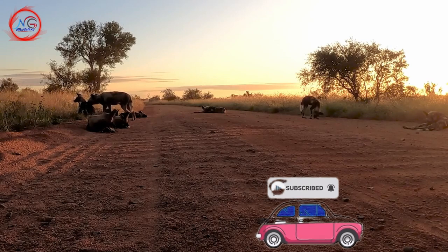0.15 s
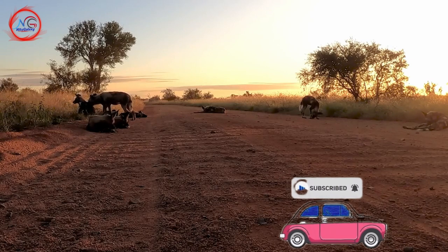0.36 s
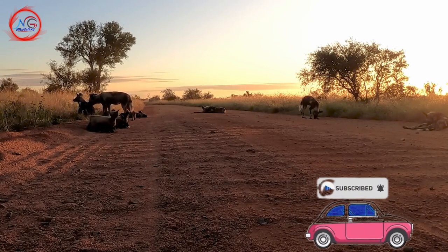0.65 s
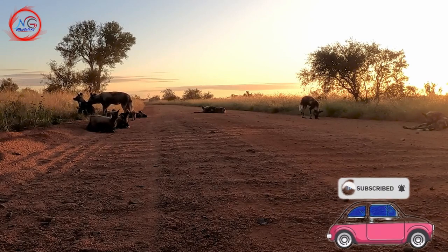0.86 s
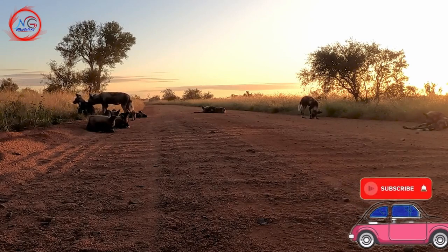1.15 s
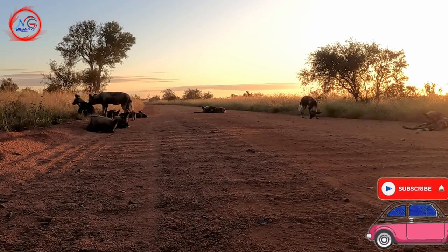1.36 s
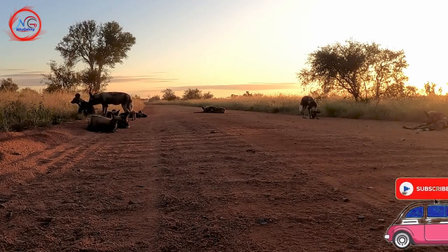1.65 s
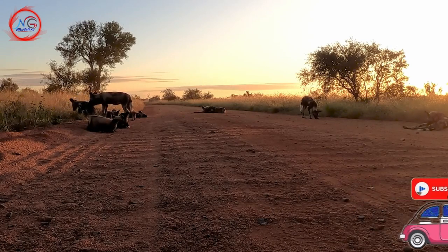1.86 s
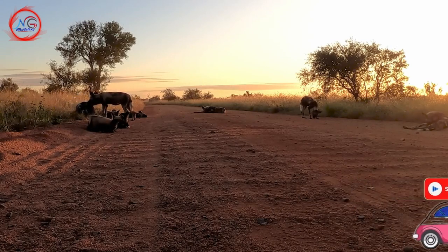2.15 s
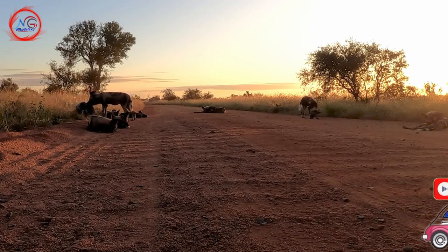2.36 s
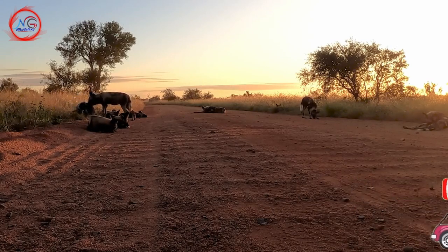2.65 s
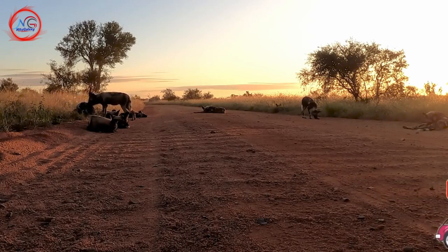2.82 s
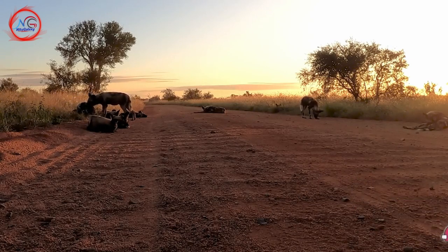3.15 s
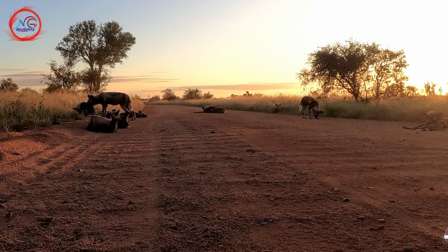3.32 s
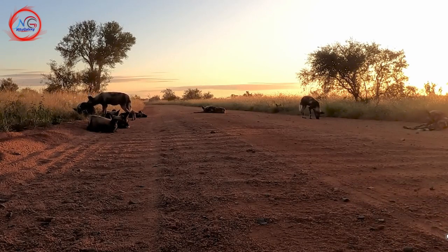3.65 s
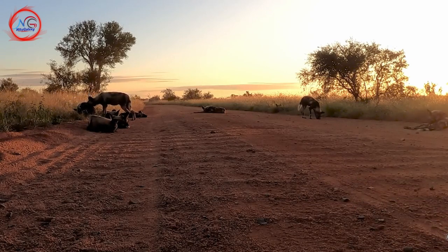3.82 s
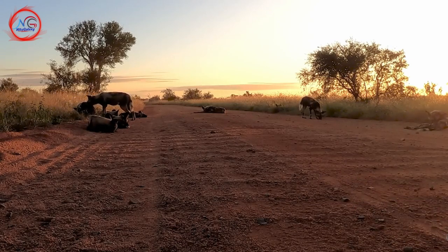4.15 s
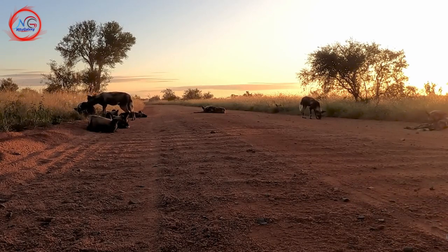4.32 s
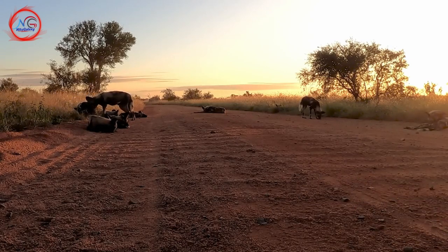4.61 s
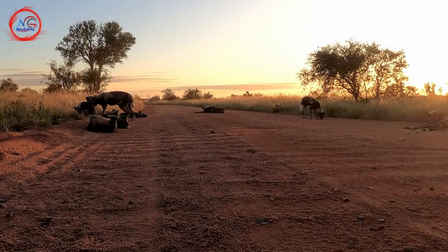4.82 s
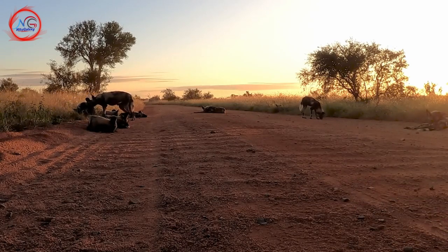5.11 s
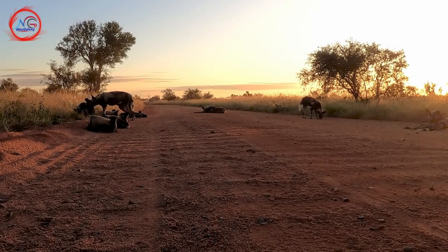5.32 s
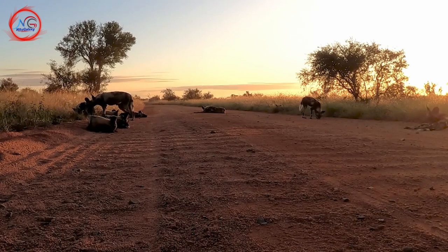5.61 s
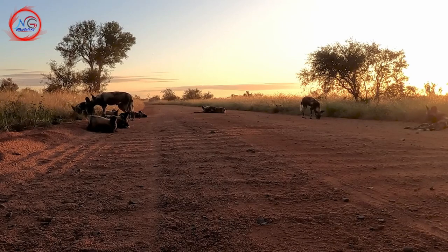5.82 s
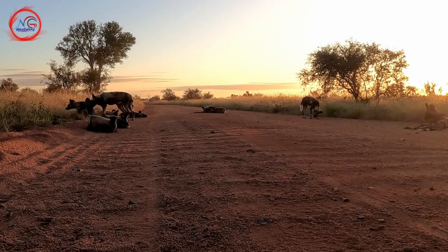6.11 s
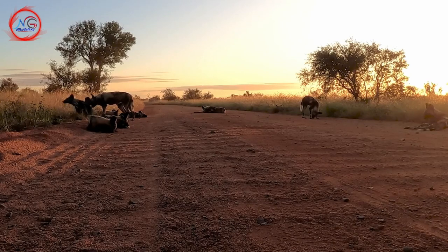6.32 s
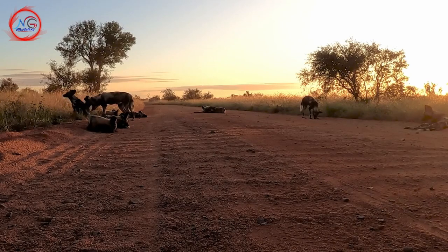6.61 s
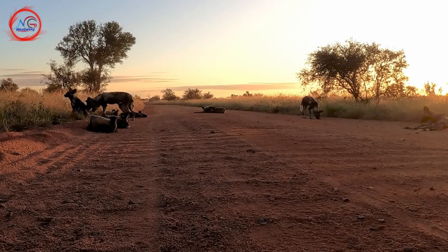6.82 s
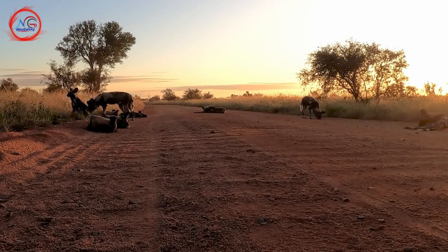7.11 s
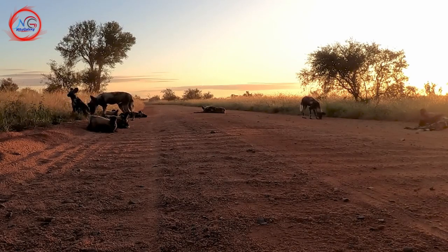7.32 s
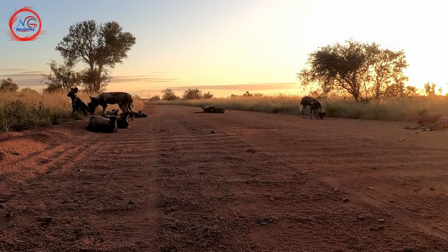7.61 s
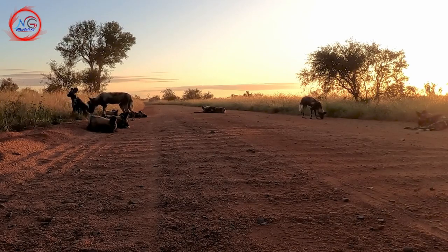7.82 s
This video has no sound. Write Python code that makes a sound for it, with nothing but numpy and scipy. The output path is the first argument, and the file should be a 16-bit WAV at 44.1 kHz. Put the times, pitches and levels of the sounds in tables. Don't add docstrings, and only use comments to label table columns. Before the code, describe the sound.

Outdoor dawn chorus in dry open grassland. A nearby bird whistles clear arched phrases and short held notes, while small warblers add falling slurs in threes, quick trills, ticks and pips. A thin high singer climbs early, then slides downward near the end. Later come dry double-note rattles. Very faint dove coos and steady frog knocks sit far back under a soft continuous hiss, with slight echoes from scrub.

```python
import sys
import numpy as np
from scipy import signal
from scipy.fft import next_fast_len
from scipy.io import wavfile
from scipy.ndimage import uniform_filter1d

SR = 44100
rng = np.random.default_rng(int(sys.argv[2]) if len(sys.argv) > 2 else 0)


def materialize(psi):
    bounded = np.clip(np.atleast_2d(psi).T, -1, 1)
    quanta = np.round(bounded * 32767).astype(np.int16)
    wavfile.write(sys.argv[1], SR, quanta)


def volts(x):
    e = np.asarray(x, float) / 20
    return 10 ** e


N = 351036

# frequency in Hz, density in dB per Hz.
AIR = [(88, -62), (150, -75), (372, -42.5), (649, -28.5), (894, -13), (1150, -14), (1590, -10), (3110, -8),
       (3560, -12), (4820, -3.5), (5250, -10.5), (5500, -19), (7340, -20), (8150, -23), (8400, -33.5),
       (9000, -27.5), (10900, -31), (18500, -120)]
# frequency in Hz, density in dB per Hz.
TOP = [(4880, -29), (8300, -29.5), (8590, -15), (9820, -2.5), (11000, -4.5), (12800, 2.5), (13150, -5),
       (15600, -9.5)]

# time after the start in seconds, offset from the centre pitch in Hz.
SLUR = [(0, 298.5), (.02, -300)]
TRILL = [(0, 400.5), (.005, 0.5), (.012, -450)]
PIP = [(0, 28), (0.016, -34.5)]
RISE = [(0, -700), (.008, 102), (.02, 698)]
TICK = [(0, -1900), (.006, -0.5), (0.012, 1999)]
BUZZ = [(0, -700), (.006, 702.5)]
FLICK = [(0, -1100), (.003, -100), (.012, 357)]
HOOK = [(0, -1000), (.004, 150.5), (.011, -49.5), (.024, -160)]
STROKE = [(0, -300), (.009, 248)]
GRACE = [(0, -400), (.008, 400.5)]
COO = [(0, 21), (.045, -21)]
CROAK = [(0, 127.5), (.012, -120)]

# share of the length, share of the way from low to top pitch, dB from the note's level.
ARCH = [(0, .2, -14.5), (.12, .5, -5), (.25, .75, -1), (.57, 1, 0), (.82, .78, -1), (1, -.12, -4)]
WAVE = [(0, 0, -5), (.2, .2, -1.5), (.5, 0.99, -0.5), (.75, .6, -1.5), (1, -.05, -4)]
LIFT = [(0, 0.0056, -12), (.3, .5, -13), (.55, .78, -6), (.78, 0.89, -0.5), (.97, 1, -3), (1, 0.93, -13)]
STRAIGHT = [(0, 0.23, -4.5), (.6, .7, -2.5), (1, 0.82, 3.5)]
DROP = [(0, 0.75, -25.5), (.1, 0.99, -20.5), (.25, 0.95, -19.5), (.6, 0.74, -14), (.9, .13, -0.5),
        (1, 0.029, -18.5)]
SLIDE = [(0, 0.97, -14.5), (.1, .85, -6), (.4, .63, -11.5), (.7, .33, -7), (.85, .16, -3.5),
         (1, 0.071, 0.5)]

# start in seconds, length in seconds, first pitch in
# Hz, last pitch in Hz, level in dB.
FAR_GLIDES = [(1.267, .06, 3450, 2640, -57.5), (1.64, 0.05, 3370, 2676, -57.5),
              (2.741, 0.032, 3300, 2886, -53), (2.784, 0.03, 2910, 2500, -64),
              (4.564, 0.015, 4260, 3720, -51.5), (5.487, 0.03, 4700, 3440, -56),
              (6.567, 0.019, 3840, 3090, -53.5), (6.538, 0.053, 3300, 2910, -63),
              (3.636, 0.015, 3376, 3044, -44.5), (3.256, .13, 3114, 2216, -59.5),
              (3.377, 0.078, 3400, 3190, -63), (3.53, 0.084, 2926, 2150, -59.5),
              (6.371, 0.14, 2970, 2340, -65), (6.625, .13, 3040, 2313, -59),
              (6.787, 0.072, 3340, 2850, -63.5), (6.811, 0.035, 3840, 3360, -54),
              (6.88, 0.1, 3035, 2186, -62.5), (7.123, 0.045, 3699, 3380, -61.5),
              (.002, 0.13, 1925, 1926, -63), (1.268, .03, 3750, 3640, -54.5),
             (2.185, .12, 2390, 2410, -63.5), (2.323, .034, 3760, 3750, -57),
             (3.488, 0.039, 3660, 3720, -55.5), (7.01, .06, 2150, 2000, -68),
             (.39, 0.12, 1830, 1840, -69.5), (7.56, 0.13, 2100, 2250, -66.5),
             (2.654, .019, 2950, 3350, -54), (5.59, 0.02, 3400, 3300, -58),
             (5.64, 0.039, 3050, 3400, -58.5), (5.725, 0.018, 3400, 4100, -60.5),
             (6.365, 0.018, 3650, 2700, -58), (6.074, .036, 2420, 2200, -60),
             (4.212, .035, 3680, 3780, -55), (5.39, 0.053, 3610, 3810, -59),
             (6.538, 0.031, 3900, 3750, -51),
              (0.521, .045, 2590, 2525, -60.5), (0.825, 0.036, 1850, 2040, -66.5),
               (1.322, .05, 2750, 2580, -67), (1.69, 0.033, 2750, 2610, -64.5),
               (1.752, 0.09, 3105, 2585, -68.5), (1.906, 0.047, 1846, 2070, -65),
               (1.759, .04, 5620, 6180, -62), (1.79, .03, 4980, 5700, -62), (2.233, .04, 6000, 5030, -64.5),
               (2.34, 0.043, 2467, 2400, -66.5), (2.863, .035, 2365, 2140, -63),
               (3, .07, 3340, 3230, -63.5), (3.248, 0.021, 3650, 3720, -61.5),
               (5.115, 0.026, 2890, 3990, -55.5), (5.305, .07, 3370, 3170, -63),
               (5.295, .05, 3770, 3640, -63), (4.1, .015, 3880, 3760, -54), (4.351, .03, 4100, 3920, -57.5),
               (1.382, .015, 5620, 7200, -68), (1.577, .02, 6000, 6800, -70.5),
               (5.011, .02, 4710, 5550, -61.5)]
FAR_HOOKS = [
    (6.6, 0.031, 2406, 2560, -56),
]
FAR_BOWS = [
    (2.551, .175, 2400, 1830, -64.5),
    (2.672, .058, 3500, 3560, -48),
    (2.19, .11, 3080, 3250, -66),
    (6.73, .17, 1930, 1880, -67.5),
    (2.39, .085, 1760, 1800, -68),
]

# start in seconds, number of notes, level in dB.
SLUR_GROUPS = [(.015, 3, -60.5), (.637, 3, -53.5), (1.232, 3, -59), (3.37, 1, -58), (2.83, 3, -64),
               (5.399, 3, -58.5), (3.62, 2, -60), (.95, 1, -55), (1.518, 1, -58.5), (2.602, 3, -54),
               (4.013, 3, -60), (4.487, 3, -54.5), (4.745, 1, -53), (6.152, 2, -54), (6.802, 2, -54.5),
               (7.612, 1, -52), (.271, 3, -53), (.999, 3, -52), (1.394, 3, -53.5), (1.551, 1, -54.5),
               (1.834, 3, -52), (2.118, 3, -57.5), (2.26, 3, -52), (2.422, 3, -58.5), (2.983, 3, -53),
               (3.403, 3, -51), (3.774, 3, -53.5), (4.148, 3, -54), (4.305, 3, -61), (5.202, 3, -52.5),
               (5.665, 1, -52), (5.976, 3, -53.5), (6.419, 3, -51.5), (6.869, 2, -49.5), (7.186, 3, -52),
               (7.392, 3, -58)]

# start in seconds, length in seconds, low pitch in Hz, top pitch in Hz, level in dB.
ARCHES = [
    (0.024, 0.096, 2353, 2960, -45.5),
    (0.436, 0.081, 2506, 2987, -45),
    (0.58, 0.099, 2283, 3010, -47),
    (3.746, 0.094, 2594, 3005, -45),
    (3.9, 0.07, 2366, 2920, -43.5),
    (4.282, 0.086, 2456, 2956, -43.5),
    (4.428, 0.087, 2340, 2930, -44.5),
    (7.671, 0.079, 2386, 3003, -41),
    (7.807, 0.092, 2370, 2860, -42),
]
WAVES = [
    (0.115, 0.096, 2343, 2974, -44.5),
    (.209, 0.086, 2305, 2637, -46.5),
    (3.986, 0.076, 2318, 2844, -43.5),
    (4.069, .085, 2305, 2505, -46.5),
    (7.908, 0.077, 2387, 2780, -43),
]
LIFTS = [
    (4.525, 0.13, 2244, 3236, -35.5),
]
# time in seconds, pitch in Hz, level in dB.
LONG_NOTES = [
    [(0.712, 2460, -52.5), (0.724, 2625, -47.5), (0.742, 2990, -44), (0.764, 3196, -37.5),
     (0.81, 3306, -39.5), (0.838, 3204, -44), (0.85, 3222, -54)],
    [(0.99, 3150, -53), (1.0, 3070, -45), (1.018, 3177, -38), (1.056, 3346, -39), (1.112, 3386, -43.5),
     (1.125, 3330, -56.5)],
    [(3.512, 3110, -51.5), (3.528, 3161, -44), (3.56, 3300, -41.5), (3.612, 3346, -39.5),
     (3.634, 3375, -47), (3.644, 3240, -40.5), (3.652, 3120, -48)],
    [(4.785, 3120, -53), (4.795, 3101, -45), (4.815, 3120, -36), (4.843, 3294, -37), (4.881, 3335, -37),
     (4.913, 3318, -40), (4.928, 3318, -56)],
    [(7.408, 3200, -56), (7.42, 3187, -46), (7.434, 3215, -39.5), (7.478, 3370, -37.5), (7.53, 3413, -39.5),
     (7.546, 3405, -43), (7.556, 3380, -57.5)],
]

# first note in seconds, last note in seconds, notes, first pitch in Hz, level in dB.
RISING_TRILLS = [
    (0.541, 0.922, 21.5, 4150, -52.5),
    (1.664, 1.816, 9.5, 4450, -50.5),
    (4.655, 4.945, 16.5, 4410, -50.5),
]
LEVEL_TRILLS = [(0.043, 0.217, 9.5, 4350, -60), (1.626, 1.794, 9.5, 4300, -53.5),
                (1.989, 2.188, 9.5, 3720, -67.5), (2.577, 2.812, 13.5, 5000, -52.5),
                (3.678, 4.036, 19.5, 4350, -53.5), (5.699, 5.82, 7.5, 4500, -53),
                (6.646, 6.779, 8.5, 4890, -51), (7.012, 7.182, 10.5, 5280, -52.5),
                (7.545, 7.677, 9.5, 4400, -50.5), (7.553, 7.622, 5.5, 3240, -55.5),
                (7.699, 7.792, 6.5, 4300, -51)]

# start in seconds, peak level in dB, pitch in Hz.
COOS = [(0.172, -70.5, 887), (0.828, -69.5, 890), (1.14, -77.5, 937), (2.64, -71.5, 930), (4.214, -71, 906),
        (4.639, -71.5, 960), (5.509, -68, 944), (5.737, -69, 923), (6.391, -72, 920), (6.621, -75, 993),
        (7.048, -73, 923), (7.25, -71.5, 870), (7.634, -75.5, 887), (7.719, -74, 865)]

# start in seconds, centre pitch in Hz, level in dB.
TICKS = [(.347, 4750, -49), (.378, 4680, -43), (0.411, 4570, -47), (1.063, 6800, -61), (1.095, 6340, -59),
         (1.127, 6320, -61.5), (1.159, 6030, -60.5), (2.972, 4840, -58), (4.524, 4990, -43),
         (4.556, 5220, -46.5), (4.583, 5240, -49), (4.614, 5140, -54), (5.517, 5590, -42.5),
         (5.547, 5430, -42.5), (5.576, 5170, -40.5), (5.608, 4780, -40), (5.641, 4660, -40.5)]
PIPS = [(1.539, 3980, -49), (1.577, 4050, -50.5), (1.613, 3920, -50), (2.752, 3950, -51),
        (2.958, 3930, -47), (3.102, 3800, -53), (3.845, 3910, -48), (4.519, 3540, -50.5),
        (4.597, 4010, -49), (4.894, 3990, -48.5), (4.93, 4050, -49.5), (4.969, 3890, -44),
        (4.934, 2635, -54.5), (6.265, 7650, -58), (7.196, 3500, -54), (7.275, 4010, -55.5),
        (7.792, 3680, -51.5),
        (3.087, 3890, -55), (3.102, 4270, -50.5), (3.77, 3860, -49), (3.772, 3460, -55),
             (4.48, 3870, -57), (4.53, 3930, -51), (5.525, 2820, -57), (5.55, 2640, -57), (5.84, 3510, -52),
             (5.846, 3930, -51), (5.85, 4720, -49), (5.875, 3880, -51.5), (5.924, 3850, -48.5),
             (1.575, 4720, -53.5)]
RISES = [(1.983, 5220, -59.5), (2.328, 6620, -65), (2.365, 5300, -63), (2.525, 6330, -63.5),
         (2.559, 5350, -65.5), (2.721, 6470, -64.5), (2.914, 6410, -63), (3.027, 4110, -47),
         (2.947, 5100, -62.5), (3.138, 4920, -59.5), (3.109, 6420, -66.5), (4.497, 5300, -50),
         (5.06, 4060, -58), (5.069, 6040, -62), (5.16, 4440, -50)]
STROKES = [
    (4.964, 1975, -53.5),
    (4.977, 1960, -56.5),
    (5.013, 2070, -56.5),
    (5.043, 2054, -56.5),
    (5.093, 1970, -54),
    (5.041, 3550, -55),
    (5.21, 3510, -57.5),
    (5.627, 2040, -57),
    (5.655, 1980, -55),
]
BUZZES = [
    (1.953, 6390, -52.5),
    (2.113, 6350, -49.5),
    (2.272, 6200, -50.5),
    (6.258, 6400, -50.5),
]

# start in seconds, length in seconds, low pitch in Hz, top pitch in Hz, level in dB.
UPPER_VOICE = [
    (1.705, .13, 6710, 8700, -63.5),
    (2.025, .08, 7150, 8500, -64),
]
DROPS = [
    (6.98, .13, 6200, 8430, -42.5),
    (7.251, .195, 6200, 8350, -42),
]
SLIDES = [
    (6.835, .018, 5170, 7404, -47),
    (6.87, 0.098, 5370, 6240, -59),
    (7.145, .23, 4820, 7040, -52),
    (7.475, .225, 4540, 7160, -47.5),
    (7.797, 0.16, 4920, 7200, -48.5),
]
# time in seconds, pitch in Hz, level in dB.
HIGH_NOTES = [
    [(1.71, 5550, -68), (1.756, 5960, -64), (1.79, 6270, -58.5), (1.842, 6547, -48.5), (1.874, 6556, -45),
     (1.922, 6840, -49), (1.935, 6670, -67)],
    [(2.02, 5620, -70), (2.054, 6066, -67.5), (2.088, 6360, -50.5), (2.104, 6449, -61),
     (2.114, 6510, -49.5), (2.194, 6710, -41), (2.235, 6557, -65)],
    [(6.6, 4384, -48), (6.608, 4420, -54), (6.616, 4843, -57.5), (6.632, 5410, -50.5), (6.668, 6160, -45),
     (6.69, 6350, -47.5), (6.7, 6380, -64.5)],
]
# start in seconds, length in seconds, first pitch in Hz, last pitch in Hz, level in dB.
SIZZLES = [
    (1.82, 0.115, 8400, 8700, -66),
    (1.881, .055, 9050, 9070, -65),
    (2.101, .08, 8200, 8320, -67),
    (2.169, .065, 8540, 7820, -65),
]

# flicks in seconds, hooks in seconds, level in dB.
RATTLES = [
    (5.832, 5.897, -45),
    (6.103, 6.178, -44.5),
    (6.346, 6.423, -45.5),
    (6.596, 6.672, -43.5),
    (6.851, 6.922, -43),
]

FLUTTER = signal.butter(4, 450, fs=SR, output="sos")


def evened(x):
    return x / np.sqrt(np.mean(x ** 2) + 1e-20)


def read(points, hz):
    f, value = np.transpose(points)
    return np.interp(np.log(hz + 1), np.log(f + 1), value)


def smooth(x, bands, frames):
    return uniform_filter1d(uniform_filter1d(x, bands, 0), frames, 1)


def add(mix, s, sound):
    part = mix[max(round(s * SR), 0):][:len(sound)]
    part += sound[:len(part)]


def tone(hz, db, taper, rough=0.):
    flutter = evened(signal.sosfilt(FLUTTER, rng.standard_normal((2, len(hz)))))
    phase = 2 * np.pi * (np.cumsum(hz) / SR + rng.random()) + rough * flutter[1]
    level = np.sqrt(2) * volts(db) * (1 + rough * flutter[0])
    return level * np.sin(phase) * signal.windows.tukey(len(hz), min(taper, 1))


def chip(shape, hz, db, taper=.6, rough=.15, fade_db=0):
    s, offset = np.transpose(shape)
    t = np.arange(s[-1] * SR) / SR
    return tone(hz + np.interp(t, s, offset), db - fade_db * t / s[-1], taper, rough)


def whistle(rows, rough, waver_db):
    s, hz, db = np.transpose(rows)
    t = np.arange(s[0], s[-1], 1 / SR)
    rounded = uniform_filter1d(np.interp(t, s, hz), 500, mode="nearest")
    waver = evened(uniform_filter1d(uniform_filter1d(rng.standard_normal(len(t)), 300), 300))
    level_db = np.interp(t, s, db) + waver_db * (waver - waver_db / 9)
    return s[0], tone(rounded, level_db, 0.0054 / (s[-1] - s[0]), rough)


def phrases(*kinds, breath_s=0):
    notes = []
    for shape, rows in kinds:
        for s, length, low, top, db in rows:
            notes.append([(s + u * length, low + v * (top - low), db + rel_db) for u, v, rel_db in shape])
    notes.sort()
    out = notes[:1]
    for note in notes[1:]:
        last_s, _, last_db = out[-1][-1]
        if abs(note[0][0] - last_s) < breath_s:
            joint = (*note[0][:2], last_db)
            out[-1] = out[-1][:-1] + [joint] + note[1:]
        else:
            out.append(note)
    return out


def air():
    frames, hz = N // 128 + 5, np.fft.rfftfreq(512, 1 / SR)
    a, b, patches = rng.standard_normal((frames, 257, 3)).T
    patches = evened(smooth(patches, 5, 12))
    patchy_db = 3.0 * np.clip(hz / 2500, .55, 1)
    z = (a + 1j * b) * volts(read(AIR, hz)[:, None] + patchy_db[:, None] * patches)
    return volts(-61) * evened(signal.istft(z, nperseg=512, noverlap=384)[1][:N])


def chatter():
    per_s, spread_db = 170, 2.5
    train = volts(spread_db * rng.standard_normal(N)) * (rng.random(N) < per_s / SR)
    kind = rng.integers(0, 10, N)
    shapes = [SLUR, TRILL, PIP, FLICK, TRILL]
    notes = np.zeros(N)
    for k, hz in enumerate(np.geomspace(1600, 5050, 10)):
        note = hz * chip(shapes[k % 5], hz, 0)
        notes += signal.oaconvolve(train * (kind == k), note)[:N]
    return evened(notes) * volts(-65)


def far_birds():
    out = np.zeros(N)
    for bow, rows in [(0, FAR_GLIDES), (0.18, FAR_HOOKS), (.045, FAR_BOWS)]:
        for s, length, first, last, db in rows:
            u = np.linspace(-1, 1, round(length * SR))
            glide = first + (last - first) * (u + 1) / 2
            add(out, s, tone(glide * (1 + bow * (1 - u ** 2)), db, 0.16, 0.15))
    return out


def slurs():
    out, gap_s = np.zeros(N), .033
    for s, notes, db in SLUR_GROUPS:
        for k in range(notes):
            add(out, s + k * gap_s, chip(SLUR, 4906, db))
    return out


def near_whistler():
    out = np.zeros(N)
    songs = phrases((ARCH, ARCHES), (WAVE, WAVES), (LIFT, LIFTS), breath_s=.022)
    for rows in songs + list(LONG_NOTES):
        add(out, *whistle(rows, rough=.07, waver_db=1.2))
    bounce_s, bounce_share = 0.001847, 0.18
    add(out, bounce_s, bounce_share * out)
    return out


def frog():
    out = np.zeros(N)
    first_s, gap_s, slows_s = .0368, .065313, 3.23e-6
    for k in range(round(N / SR / gap_s)):
        add(out, first_s + k * gap_s + k * k * slows_s, chip(CROAK, 1630, -64, taper=1))
    return out


def trills():
    out = np.zeros(N)
    top_hz, echo_s, echo_db, uneven_db = 4920, .0075, -11, 1.5
    for hz_per_s, rows in [(3700, RISING_TRILLS), (-100, LEVEL_TRILLS)]:
        for first, last, notes, hz, db in rows:
            for u in np.linspace(0, 1, int(notes)):
                late = u * (last - first)
                level = db - 5 * (2 * u - 1) ** 4 + uneven_db * rng.standard_normal()
                if hz_per_s > 0:
                    level -= 6 * (1 - u) ** 3
                pitch = min(hz + hz_per_s * late, top_hz)
                note = chip(TRILL, pitch + 50 * rng.standard_normal(), level + 1.5, rough=.2, fade_db=3)
                add(out, first + late, note)
                add(out, first + late + echo_s, chip(TRILL, pitch, level + echo_db, rough=.5))
    return out


def dove():
    out = np.zeros(N)
    for s, db, hz in COOS:
        add(out, s, chip(COO, hz, db - 5.5, taper=1))
    return out


def ticks():
    out = np.zeros(N)
    for s, hz, db in TICKS:
        add(out, s, chip(TICK, hz, db, taper=1, rough=.3))
        add(out, s - .004, chip(GRACE, min(hz, 4600), db - 6.5, rough=0.89))
        add(out, s + 0.00065, chip(BUZZ, 7300, db - 24, rough=.5))
    return out


def single_notes():
    out = np.zeros(N)
    for shape, rough, rows in [(PIP, .3, PIPS), (RISE, .15, RISES), (STROKE, .15, STROKES)]:
        for s, hz, db in rows:
            add(out, s, chip(shape, hz, db, rough=rough))
    return out


def thin_singer():
    out = np.zeros(N)
    for rows in phrases((STRAIGHT, UPPER_VOICE), (DROP, DROPS), (SLIDE, SLIDES)):
        add(out, *whistle(rows, rough=.2, waver_db=3))
    for rows in HIGH_NOTES:
        add(out, *whistle(rows, rough=.14, waver_db=1.5))
    for s, length, first, last, db in SIZZLES:
        add(out, s, tone(np.linspace(first, last, round(length * SR)), db, .4, rough=.7))
    return out


def buzzes():
    out = np.zeros(N)
    for s, hz, db in BUZZES:
        for k in range(5):
            at = s + k * 0.0087
            add(out, at, chip(BUZZ, hz, db - 0.54 * k ** 2, rough=0.47))
            add(out, at + .0045, chip(BUZZ, hz, db - 8 - .6 * k ** 2, rough=0.44))
    return out


def rattles():
    out = np.zeros(N)
    for flicks, hooks, db in RATTLES:
        notes = [(FLICK, 4350, flicks), (FLICK, 4350, flicks + .0355),
                 (HOOK, 4100, hooks + .003), (HOOK, 4100, hooks + .0543)]
        for shape, hz, s in notes:
            add(out, s + .003, chip(shape, hz, db + 4, taper=.35, rough=.25, fade_db=8))
            add(out, s - .006, chip(GRACE, 4450, db - 4.5, rough=0.33))
            add(out, s - .004, chip(TICK, 5300, db - 19, taper=0.74))
    return out


def scrub(x):
    t60, taps = .75, np.zeros(SR // 2)
    at = np.arange(300, SR // 2 - 40, 40) + rng.integers(0, 40, (SR // 2 - 301) // 40)
    taps[at] = rng.choice([-1., 1.], len(at)) * volts(-60 * at / SR / t60)
    x = signal.sosfilt(signal.butter(4, 5300, fs=SR, output="sos"), x)
    return signal.oaconvolve(x, taps / np.linalg.norm(taps))[:N]


def scene():
    near = near_whistler()
    warblers = slurs() + trills() + ticks() + single_notes() + buzzes() + rattles()
    small = warblers + far_birds() + dove() + thin_singer()
    echoes = scrub(volts(-15.5) * near + volts(-10.5) * small)
    return (near + small + echoes + chatter() + air() + frog())[None]


def band_limit(x):
    return signal.sosfilt(signal.butter(12, 15720, fs=SR, output="sos"), x)


def record(dry):
    shift_hz, seam_hz = 7500.3, 8270
    turning = np.exp(2j * np.pi * shift_hz * np.arange(N) / SR)
    moved = (signal.hilbert(dry[0], next_fast_len(N))[:N] * turning).real
    hz, _, (low, up) = signal.stft([dry[0], moved], SR, nperseg=512, noverlap=384)
    row_hz = hz[:, None]

    local = smooth(abs(up) ** 2, 12, 7) + 1e-20
    fill = rng.standard_normal(up.shape) + 1j * rng.standard_normal(up.shape)
    flat = evened(abs(up) / local ** .5)
    flat = np.where(abs(row_hz - 10950) < 400, np.minimum(flat, 1.2), flat)
    follow = (local / np.median(local, 1, keepdims=True)) ** (.22 * (row_hz > 12950))
    up = (flat * np.exp(1j * np.angle(up)) + 0.47 * fill) * follow * volts(read(TOP, hz))[:, None]
    up = up * volts(2.0 * evened(smooth(fill.real, 30, 20)))

    patch = smooth(abs(low) ** 2, 4, 12)
    loud = uniform_filter1d(patch, 31, 0, origin=8)
    close = uniform_filter1d(patch, 13, 0, origin=4)
    hidden_high = (patch < loud * volts(-42)) | (patch < close * volts(-34))
    hidden_mid = patch < close * volts(-42)
    masked = np.where(row_hz > 5300, hidden_high, hidden_mid) * (row_hz > 3500)
    copied = np.roll(uniform_filter1d(masked * 1., 9, 0), round(shift_hz / hz[1]), 0)
    low = low * (1 - .9 * masked)
    up = up * (row_hz >= seam_hz) * (1 - .5 * masked) * (1 - .85 * copied)
    low, up = signal.istft((low, up), SR, nperseg=512, noverlap=384)[1][:, :N]
    hiss = volts(-94.0) * rng.standard_normal(N)
    mix = low + volts(-75) * evened(up) + hiss
    return band_limit(mix[None])


dry = scene()
out = record(dry)
materialize(out)
```